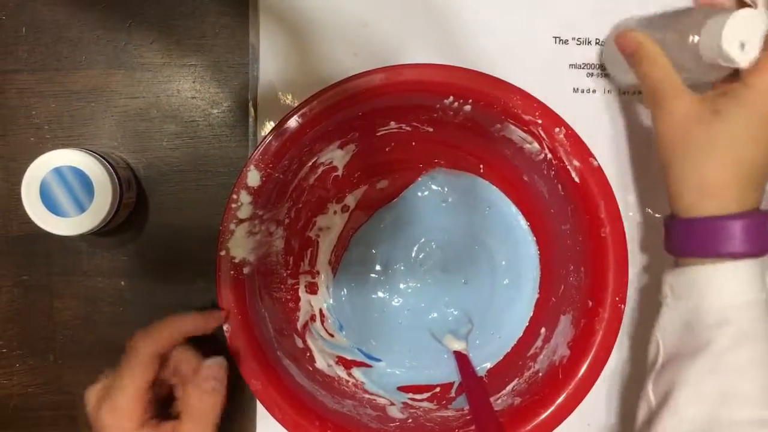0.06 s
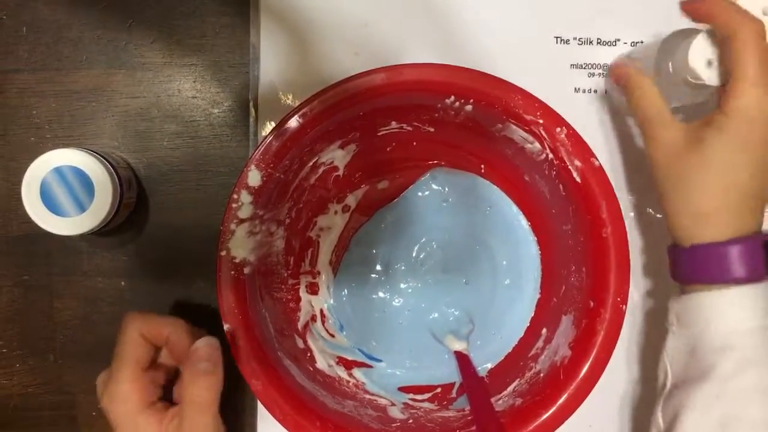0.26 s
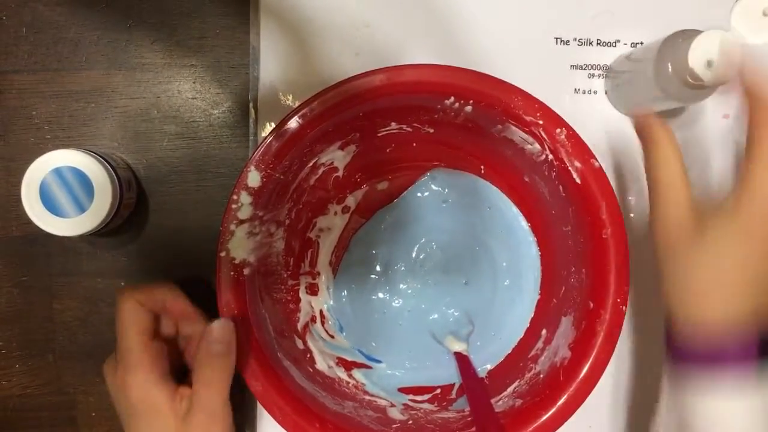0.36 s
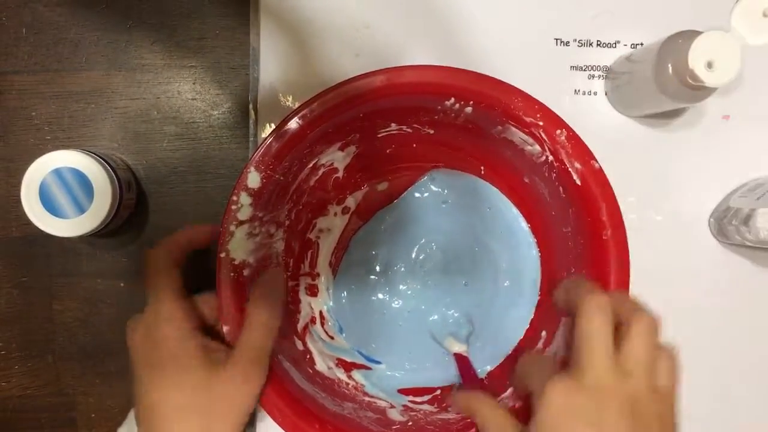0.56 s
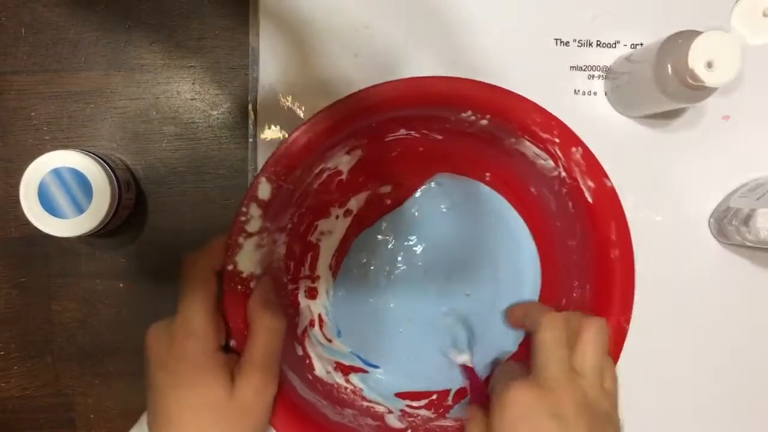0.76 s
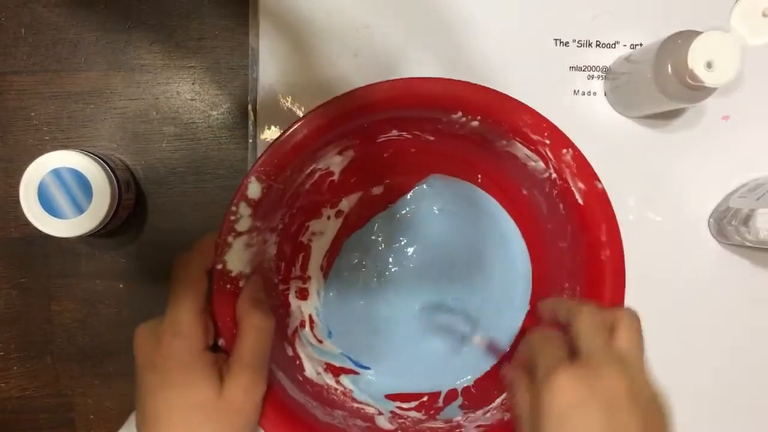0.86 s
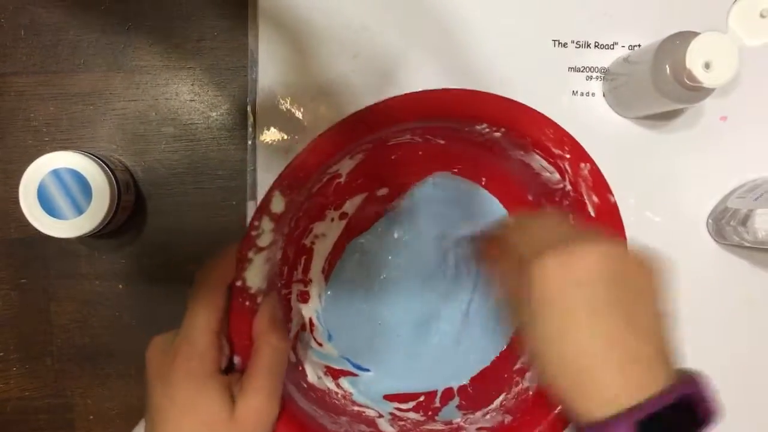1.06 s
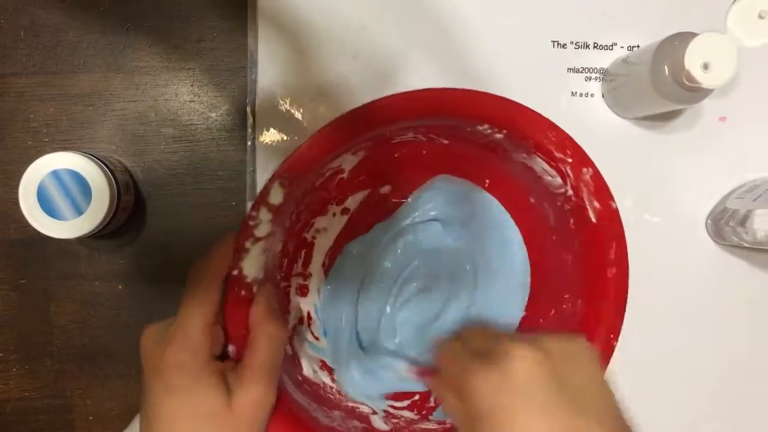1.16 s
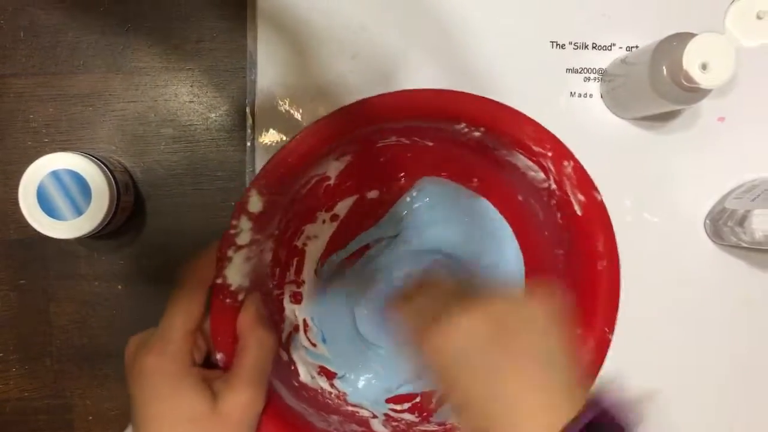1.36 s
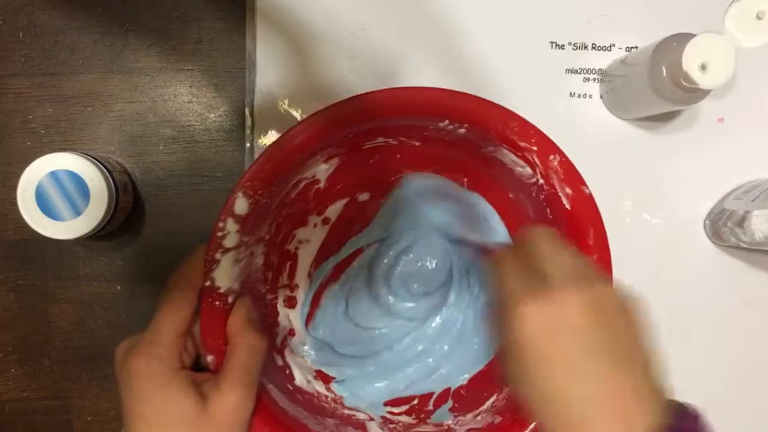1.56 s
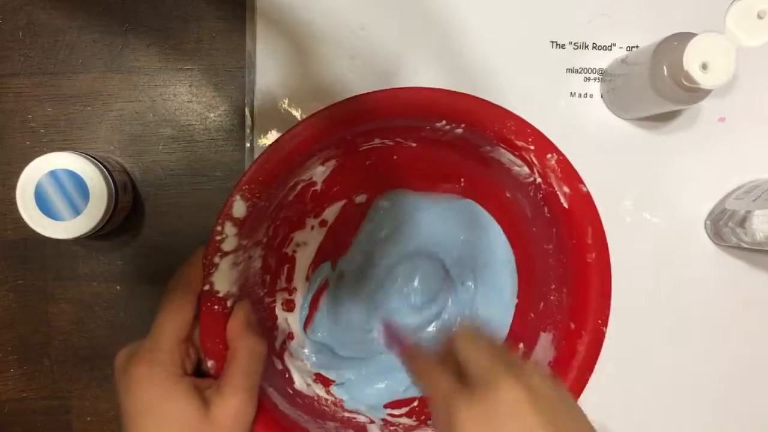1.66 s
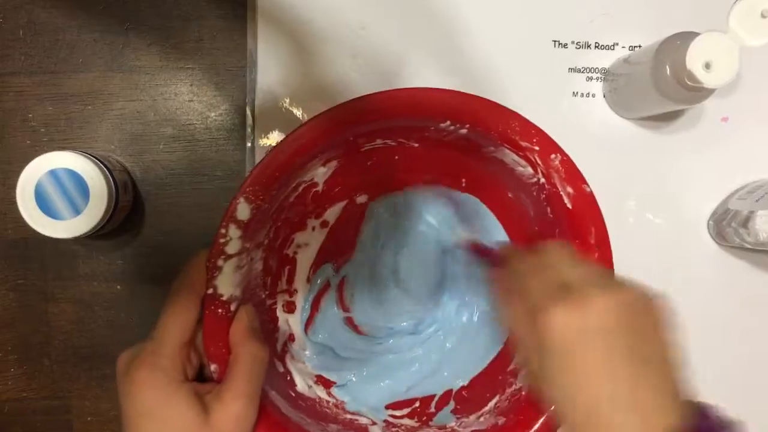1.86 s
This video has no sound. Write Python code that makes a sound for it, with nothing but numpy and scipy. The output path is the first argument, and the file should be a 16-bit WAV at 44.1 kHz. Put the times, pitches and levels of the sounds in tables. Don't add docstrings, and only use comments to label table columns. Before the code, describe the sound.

A small plastic bottle clacks onto a wooden table, then a spoon stirs slime in a bowl

```python
import sys
import numpy as np
from scipy import signal
from scipy.fft import rfft, irfft
from scipy.io import wavfile
from scipy.ndimage import uniform_filter1d

SR = 44100
rng = np.random.default_rng(int(sys.argv[2]) if len(sys.argv) > 2 else 0)


def dump_mix(stems):
    frames = np.atleast_2d(stems).T
    limited = np.clip(frames, -1, 1)
    pcm = np.round(limited * 32767).astype(np.int16)
    wavfile.write(sys.argv[1], SR, pcm)


def volts_from_decibels(level):
    exponent = np.asarray(level, float) / 20
    return 10 ** exponent


N = 83790

# (time [s], table thud [dB], plastic crack [dB])
LANDINGS = [
    (0.2053, -26.5, -26.5),
    (0.2404, -60, -41.5),
    (0.28, -46, -50),
]
# (frequency [Hz], level [dB], t60 [s])
TABLE_MODES = [(84.4, -12, 0.34), (117.2, -3, .27), (167.3, -2.5, 0.31), (221.3, -7, 0.32854),
               (252.7, 18, 0.023), (283, -10.5, 0.31), (338.4, -10.5, 0.28), (367, -15, .26),
               (432.06, -15, 0.27), (501, -27, 0.18), (654, -24, 0.16), (809, -17.5, 0.31),
               (875, -15.5, 0.16), (1011, -22.5, .15)]
# (frequency [Hz], level [dB], t60 [s])
BOTTLE_MODES = [(1400, -8.5, 0.0046), (2160, -3.5, 0.018), (3546, -4.5, 0.014), (5950, -16.5, 0.015),
                (8700, -35, 0.0045), (13000, -36, .003)]
# (time [s], peak level [dB], pitch [Hz], low ring [dB])
TAPS = [
    (0.8405, -41, 1650, -11.5),
    (0.905, -51, 1458, -18),
    (1.0655, -34, 1435, -3),
    (1.194, -55.5, 1400, -2),
    (1.3005, -45, 2035, -6),
    (1.5621, -26.5, 1670, -15.5),
    (1.5707, -32.5, 1655, -3.5),
    (1.640, -49.5, 1480, -2),
    (1.865, -39.5, 1576, 0.5),
]
# (ratio to tap pitch, level [dB], t60 [s])
BOWL_LOW_MODES = [(0.259, -3.5, 0.02245), (0.481, 0, 0.048), (.64, 2.5, .031)]
# (ratio to tap pitch, level [dB], t60 [s])
BOWL_HIGH_MODES = [(1., 4.5, 0.021), (1.56, -7.5, 0.016), (2.25, -10, 0.0077), (3.75, -23, 0.0073)]
# (time [s], length [s], level [dB], centre [Hz], width [share of centre])
CRACKLES = [(0.017, 0.0098, -66.5, 5520, 0.13), (0.633, 0.013, -68.5, 4600, 0.25),
            (.638, 0.0013, -48, 3060, 0.58), (0.6816, .007, -74.5, 8500, 0.54),
            (0.818, 0.032, -52, 1585, 0.61), (.823, 0.019, -55.5, 2700, 0.61),
            (0.821, 0.015, -62, 385, 0.32), (0.822, 0.01539, -58.5, 6740, 0.7),
            (0.8418, 0.0052, -71.5, 11500, 1.1), (0.882, 0.0047, -67, 6200, 0.55),
            (0.8937, .003, -63.5, 5700, 1.5), (0.9, 0.0034, -74, 5540, 1.01),
            (0.992, 0.004528, -73.5, 4023, 0.89), (1.142, 0.0027, -66, 4100, 0.751),
            (1.182, .003, -68.5, 13280, 0.43), (1.2622, 0.0022, -76, 13700, 0.29),
            (1.4098, 0.0015, -50, 4630, 1.2), (1.496, 0.00289, -76, 6200, 0.365),
            (1.538, 0.018, -60, 3700, 1.0566), (1.538, 0.011, -53.5, 1210, 1.1),
            (1.561, 0.005283, -62, 3975, 0.825), (1.5697, 0.0053, -55, 3700, 0.58),
            (1.8671, .003, -70, 5586, 0.46)]
# (time [s], length [s], level [dB], centre [Hz], width [share of centre])
FIZZ = [(.007, 0.027, -76, 10100, 0.41), (0.651, 0.09, -81, 2720, 0.61), (0.843, 0.14, -80, 4700, 1.2),
        (1.008, 0.053, -79.5, 13000, 1.2), (1.075, 0.03829, -80.5, 13000, 0.79),
        (1.167, 0.062, -74, 5200, 0.931), (1.316, 0.018, -92, 11000, 1.102),
        (1.407, 0.041, -66, 5360, 0.67), (1.643, 0.049, -71.5, 10600, 1.227),
        (1.715, 0.063, -69.5, 11600, 1.123), (1.806, 0.01825, -79.5, 13000, 0.884)]
# (time [s], peak level [dB], pitch [Hz])
ROCKS = [
    (.6385, -48, 87.8),
    (0.6801, -57.5, 81),
    (1.061, -60, 104.2),
    (1.3, -60, 74.8),
    (1.54, -57, 70),
    (1.63, -55, 69),
    (1.762, -64, 67),
]
# (time [s], level [dB], brightness [dB])
STIR = [(0.598, -116, -13), (0.638, -69.5, 12), (0.701, -78.5, 12.5), (.76, -73.5, -6), (.81, -85.5, 11),
        (0.849, -89, 8), (.92, -79, 8), (.98, -85, 10), (1.05, -78.5, 15), (1.15, -72.5, 6.5),
        (1.199, -66, 4.5), (1.25, -71.5, 4), (1.309, -64.5, 5), (1.378, -66.5, 3), (1.48, -65.5, -1.5),
        (1.60, -68.5, 7.5), (1.72, -71.5, 3), (1.9, -75.5, 4)]
# (frequency [Hz], density [dB per Hz])
SMEAR_SPECTRUM = [(41, -29), (71, 4.5), (121, -7.5), (331, -9.5), (801, -11), (2301, -21), (6001, -34),
                  (15000, -38.5)]
# (frequency [Hz], width [Hz], level [dB], t60 [s])
LEFTOVER = [
    (1980, 100.95, -66.5, 0.61),
    (3700, 300, -78, 0.3),
]
# (frequency [Hz], density [dB per Hz])
AIR_SPECTRUM = [(15, -109), (25, -9.5), (127, -8.5), (166, -9), (223, -9.5), (263, -15), (317, -16.5),
                (1190, -25), (16000, -45.5)]
# (centre [Hz], level [dB], t60 [s])
ROOM_BANDS = [(123.12, -19.5, 0.36), (365, -18.5, 0.29), (1081.1, -13, 0.49), (2549.6, -11, 0.39),
              (6270, -5, 0.15), (12001, -19, 0.19)]


def unit(x):
    return x / np.sqrt(np.mean(x ** 2))


def band(x, hz, width):
    return signal.lfilter(*signal.iirpeak(min(hz, 0.45 * SR), max(hz / width, 0.3), fs=SR), x)


def colour(points):
    hz, db = np.transpose(points)
    bins = np.fft.rfftfreq(N, 1 / SR)
    gain = volts_from_decibels(np.interp(np.log(bins + 1), np.log(hz), db))
    return unit(irfft(rfft(rng.standard_normal(N)) * gain, N))


def walk(rate):
    k = int(SR / rate)
    steps = np.repeat(rng.standard_normal(N // k + 1), k)
    return 1.88 * uniform_filter1d(uniform_filter1d(steps, k), k)[:N]


def ring(modes, push_s, rough=0.0):
    t = np.arange(SR // 2) / SR
    x = 0
    for hz, db, t60 in modes:
        drift = walk(75.7)[:len(t)] + 1j * walk(67.6)[:len(t)]
        waver = 1 + rough * min(hz / 300, 1) * np.clip(t / 0.012, 0, 1) * drift
        decay = np.exp(-np.log(1000) * t / t60)
        x = x + volts_from_decibels(db) * np.imag(waver * np.exp(2j * np.pi * hz * t)) * decay
    push = np.clip(t / push_s, 0, 1)
    x = x * push * push * (3 - 2 * push)
    return x / np.abs(x).max()


def add(out, s, x):
    i = int(s * SR)
    out[i:i + len(x)] += x[:N - i]


def bottle():
    crack_s, thud_lag_s, thud_push_s, thud_rough = 0.0022, 0.0018, 0.0026, 0.33006
    mic_low_hz = 99
    out, t = np.zeros(N), np.arange(SR // 8) / SR
    for s, thud_db, crack_db in LANDINGS:
        grit = rng.standard_normal(len(t)) * np.exp(-(t / crack_s) ** 2)
        crack = volts_from_decibels(-24.5) * grit
        for hz, db, t60 in BOTTLE_MODES:
            crack = crack + volts_from_decibels(db) * band(grit, hz, 2.8 / t60) * np.sqrt(t60 * 100)
        add(out, s, volts_from_decibels(crack_db) * 4 * crack)
        thud = ring(TABLE_MODES, thud_push_s, thud_rough)
        add(out, s + thud_lag_s, volts_from_decibels(thud_db + 10) * thud)
    return signal.sosfilt(signal.butter(2, mic_low_hz, "high", fs=SR, output="sos"), out)


def taps():
    push_s, choke_s = 0.00092, 0.0072
    out, t = np.zeros(N), np.arange(SR // 2) / SR
    choke = np.exp(-(t / choke_s) ** 3)
    for s, db, pitch, low_db in TAPS:
        low = [(ratio * pitch, level + low_db, t60) for ratio, level, t60 in BOWL_LOW_MODES]
        high = [(ratio * pitch, level, t60) for ratio, level, t60 in BOWL_HIGH_MODES]
        add(out, s, -volts_from_decibels(db) * ring(low + high, push_s) * choke)
    return out


def crackles():
    scatter_db, patchy_db, size = 2.5, 2, 4000
    out, t = np.zeros(N), np.arange(size) / SR
    for s, length, db, hz, share in list(CRACKLES) + list(FIZZ):
        ticks = rng.standard_normal(size)
        uneven_db = scatter_db * rng.exponential(size=size) + patchy_db * walk(250)[:size]
        swarm = ticks * volts_from_decibels(uneven_db) * np.sin(np.pi * np.clip(t / length, 0, 1) ** 0.49)
        tone = band(band(swarm, hz, share * hz), hz, share * hz)
        add(out, s, volts_from_decibels(db) * unit(tone) * np.sqrt(length / t[-1]))
    return out


def rocking():
    push_s, rough = 0.0073, 0.26
    out = np.zeros(N)
    for s, db, hz in ROCKS:
        modes = [(hz, 0, 0.2), (1.32 * hz, -6, 0.15), (2.7 * hz, -14, 0.1)]  # (Hz, dB, t60 s)
        add(out, s, volts_from_decibels(db) * ring(modes, push_s, rough))
    return out


def smear():
    flicker_db, split_hz = 1.5, 2500
    t = np.arange(N) / SR
    times, effort, bright = np.transpose(STIR)
    effort_db = np.interp(t, times, effort, left=-120)
    bright_db = np.interp(t, times, bright)
    split = signal.butter(2, split_hz, fs=SR, output="sos")
    low = signal.sosfilt(split, colour(SMEAR_SPECTRUM))
    high = colour(SMEAR_SPECTRUM)
    high = high - signal.sosfilt(split, high)
    low = low * volts_from_decibels(flicker_db * walk(90))
    high = high * volts_from_decibels(bright_db + flicker_db * walk(120))
    return volts_from_decibels(effort_db + 1.5) * (low + high)


def leftover():
    t, out = np.arange(N) / SR, np.zeros(N)
    for hz, width, db, t60 in LEFTOVER:
        out += volts_from_decibels(db - 60 * t / t60) * unit(band(rng.standard_normal(N), hz, width))
    return out


def room(x):
    build_s = 0.012
    t = np.arange(SR * 3 // 4) / SR
    tail = np.zeros(len(t))
    for hz, db, t60 in ROOM_BANDS:
        tail += volts_from_decibels(db - 60 * t / t60) * unit(band(rng.standard_normal(len(t)), hz, hz))
    return signal.fftconvolve(x, tail * np.clip(t / build_s, 0, 1) ** 2 / 60)[:N]


def air():
    return colour(AIR_SPECTRUM) * volts_from_decibels(-69.5 + walk(3.98))


def scene():
    tap_wet_db = -6
    thud = bottle()
    knocks = taps()
    rest = thud + crackles() + rocking()
    wet = room(rest + volts_from_decibels(tap_wet_db) * knocks)
    return (knocks + rest + wet + smear() + leftover() + air())[None]


def low_pass(x):
    return signal.sosfilt(signal.butter(12, 16640, fs=SR, output="sos"), x)


def record(dry):
    return low_pass(dry)


dry = scene()
out = record(dry)
dump_mix(out)
```